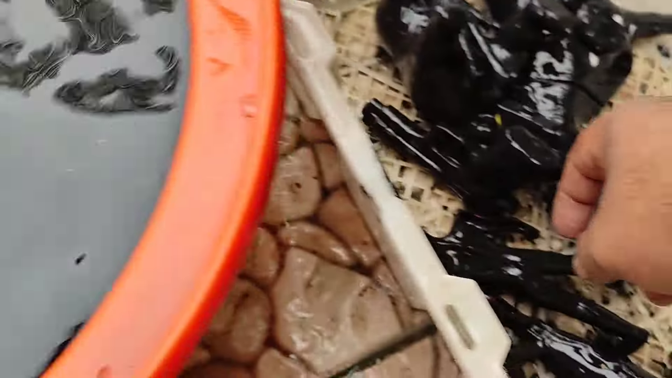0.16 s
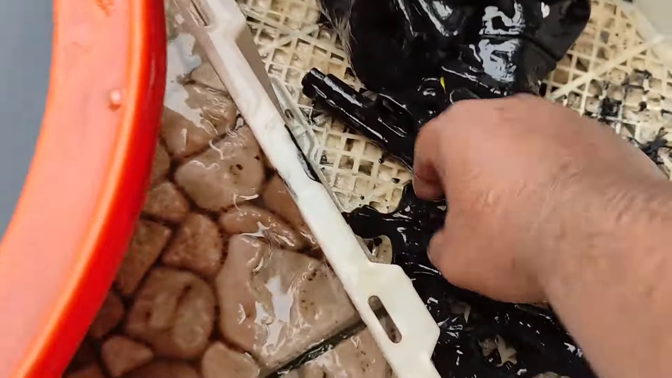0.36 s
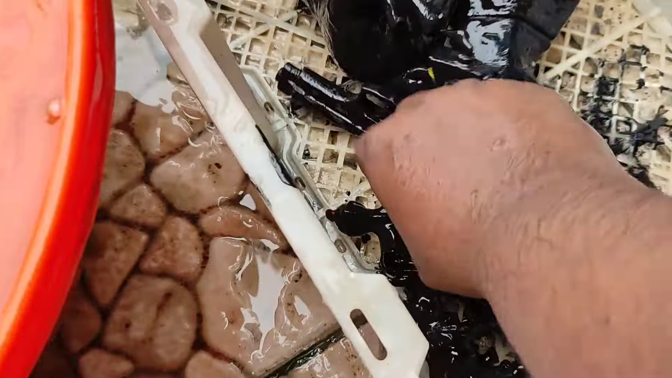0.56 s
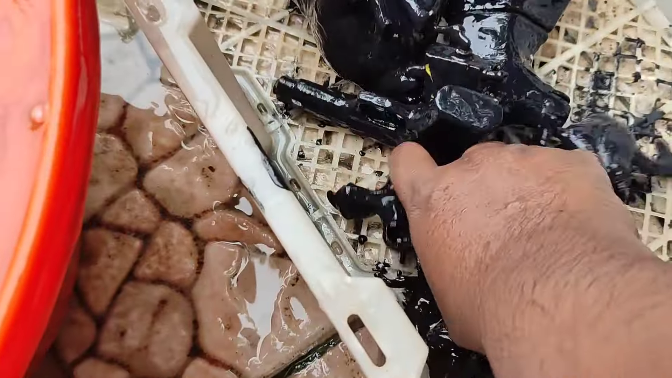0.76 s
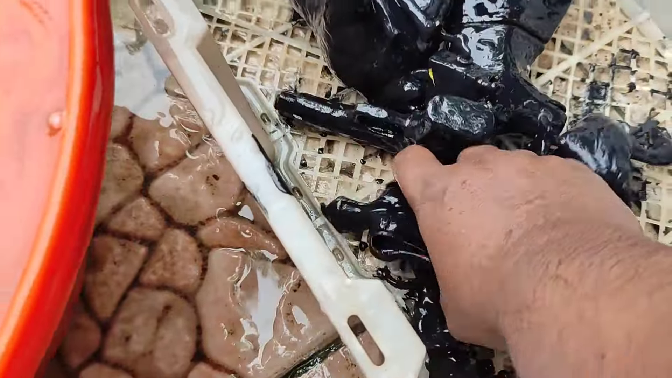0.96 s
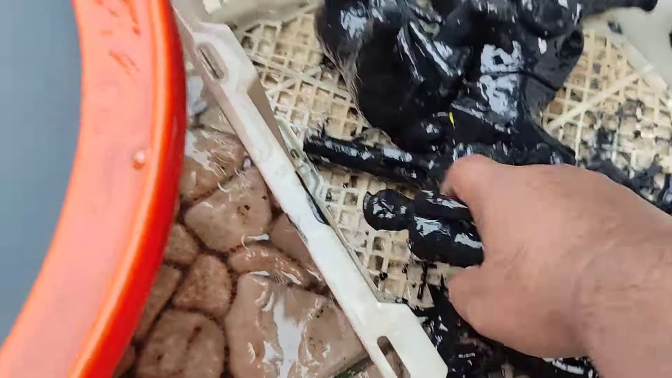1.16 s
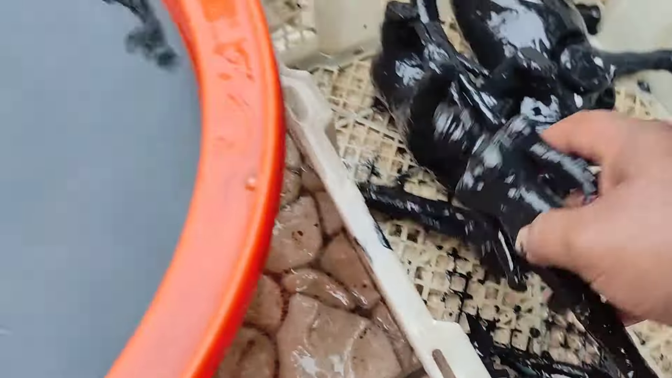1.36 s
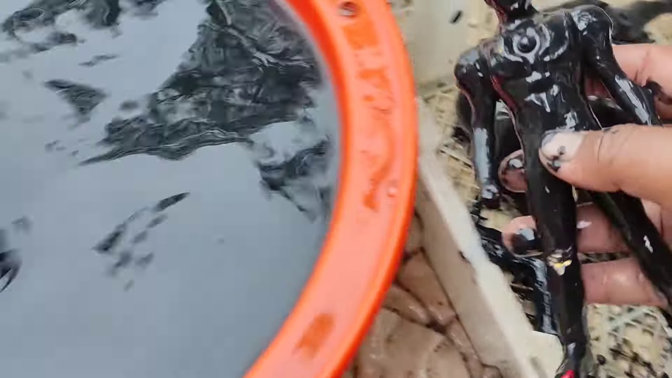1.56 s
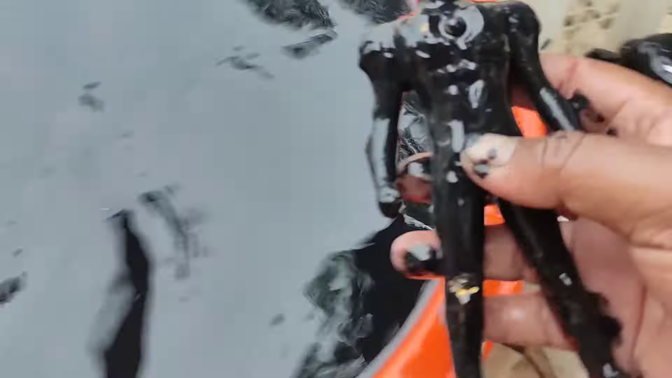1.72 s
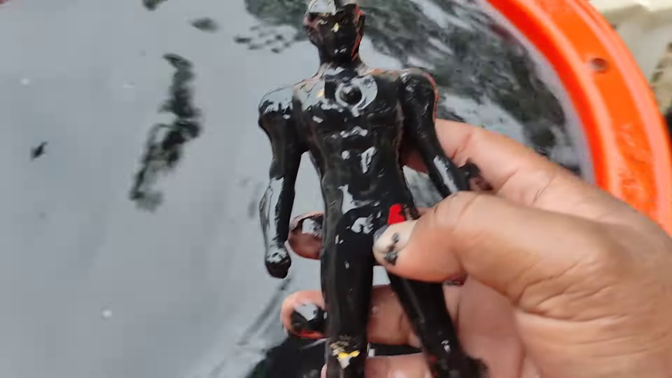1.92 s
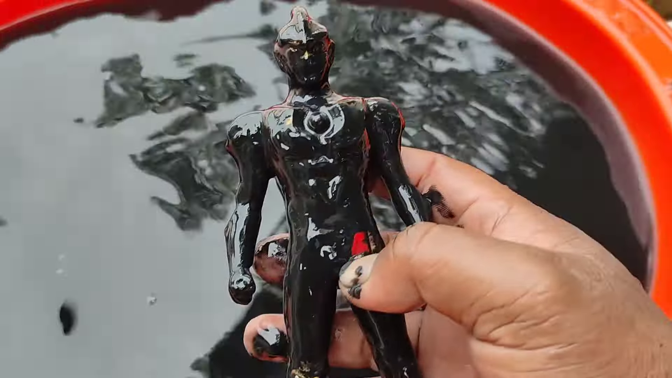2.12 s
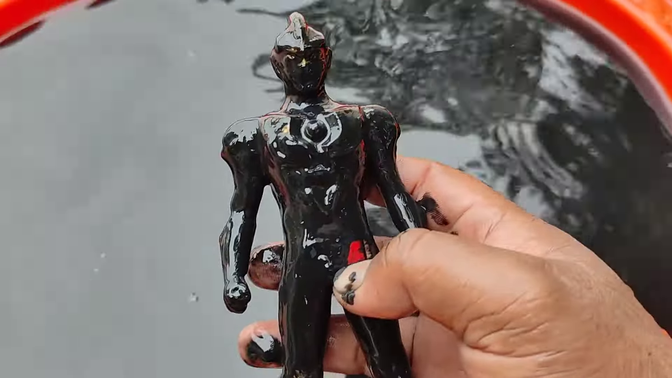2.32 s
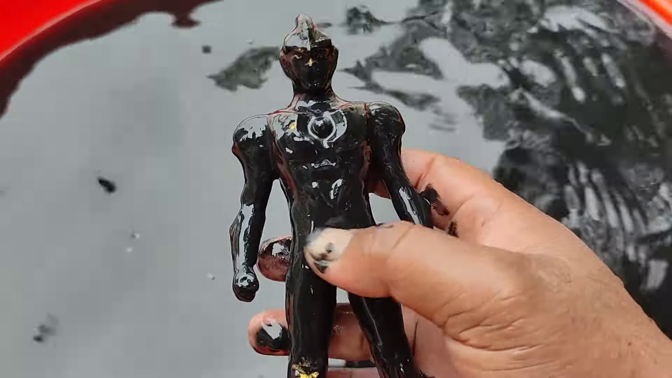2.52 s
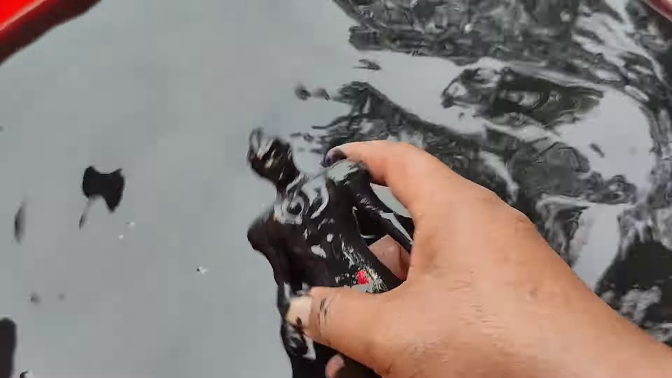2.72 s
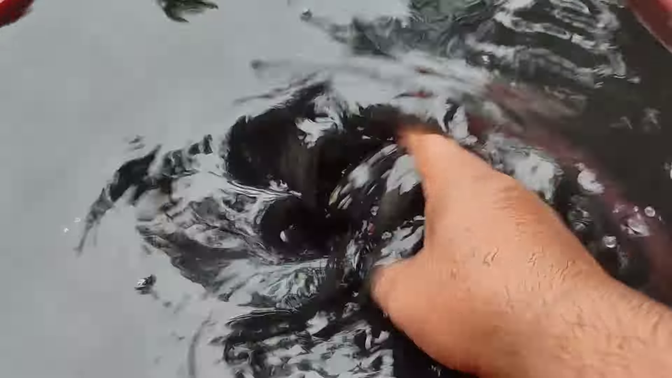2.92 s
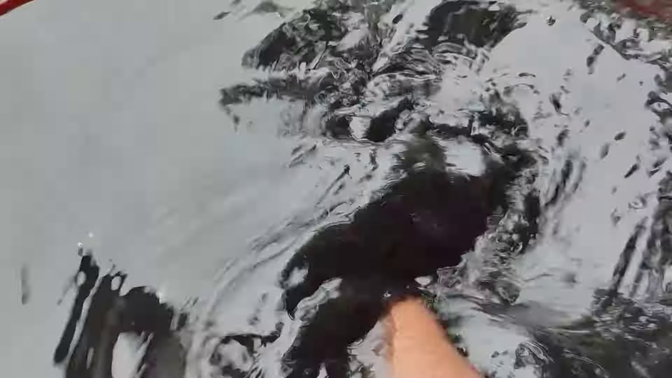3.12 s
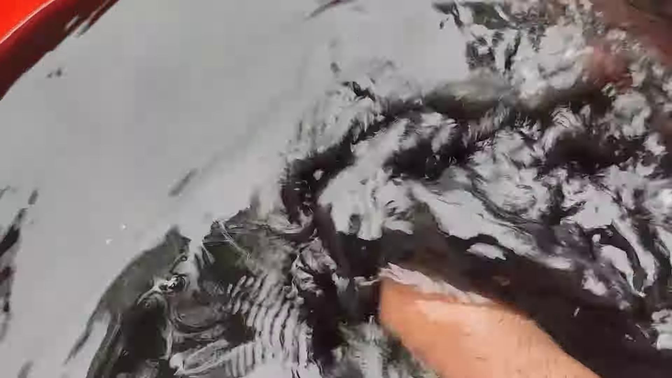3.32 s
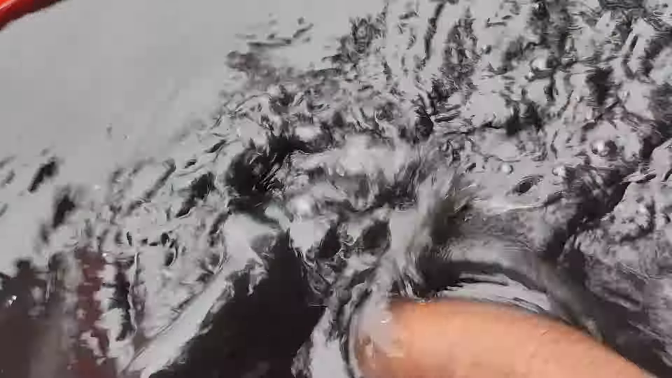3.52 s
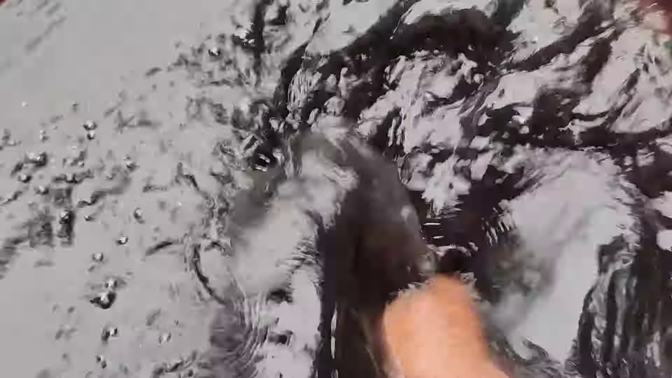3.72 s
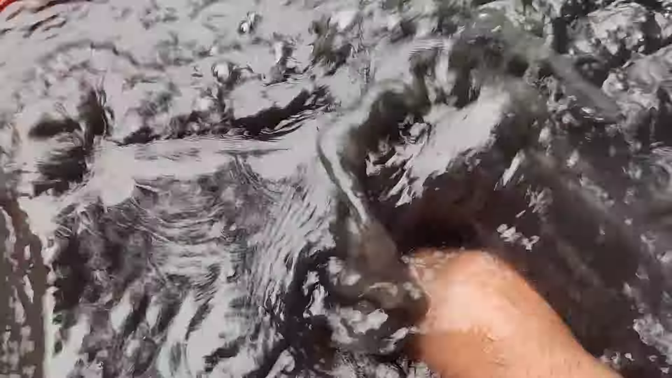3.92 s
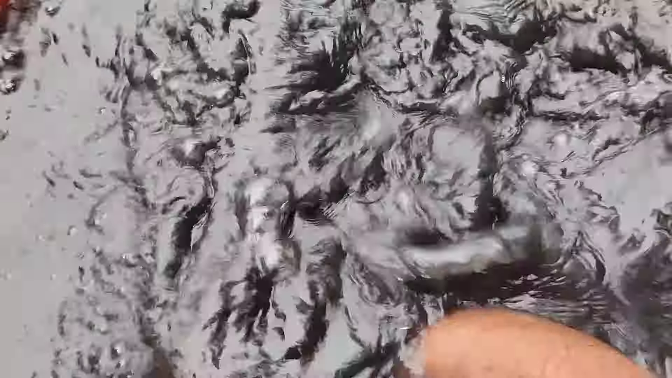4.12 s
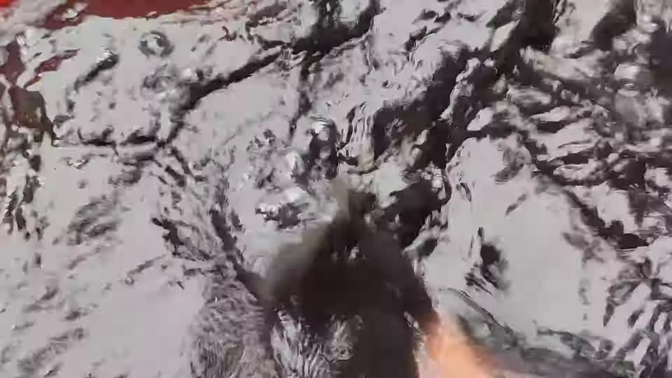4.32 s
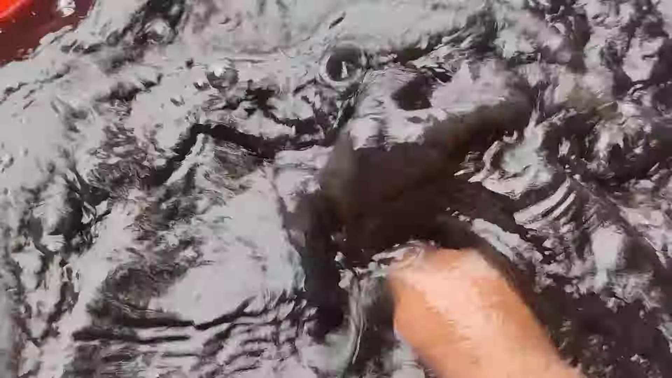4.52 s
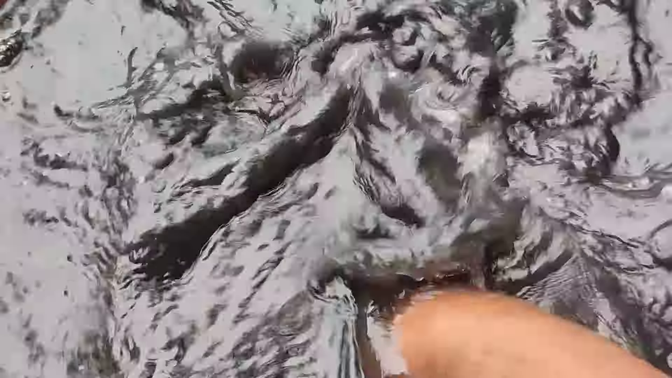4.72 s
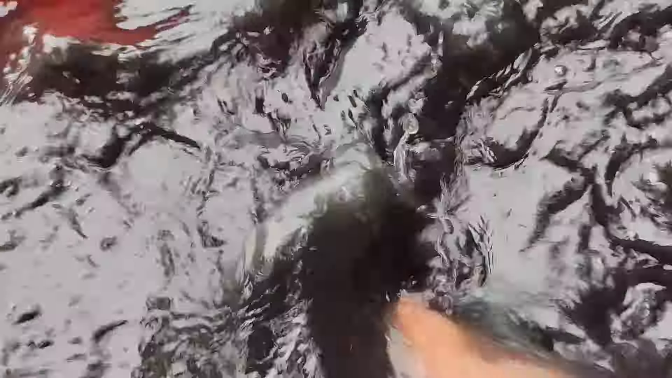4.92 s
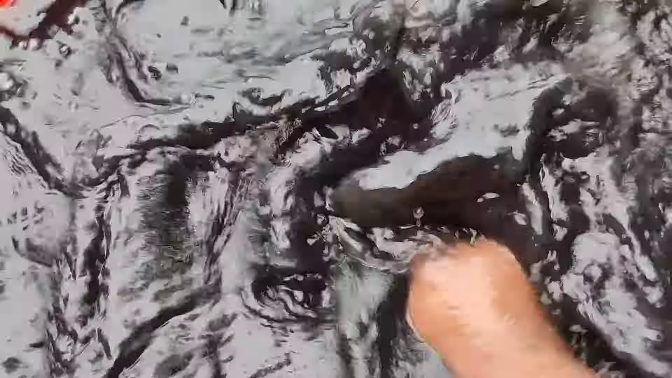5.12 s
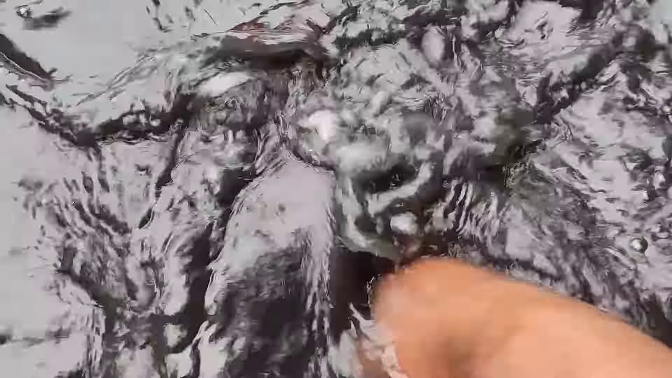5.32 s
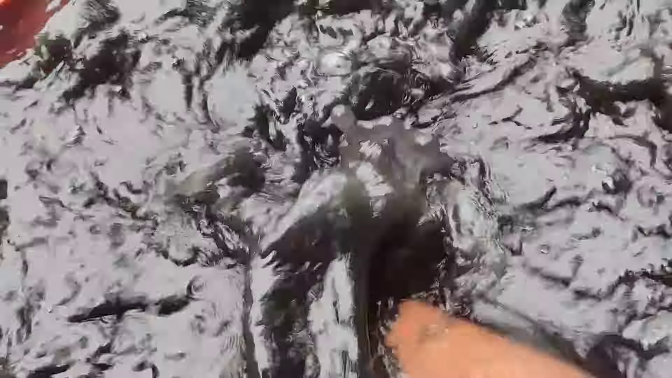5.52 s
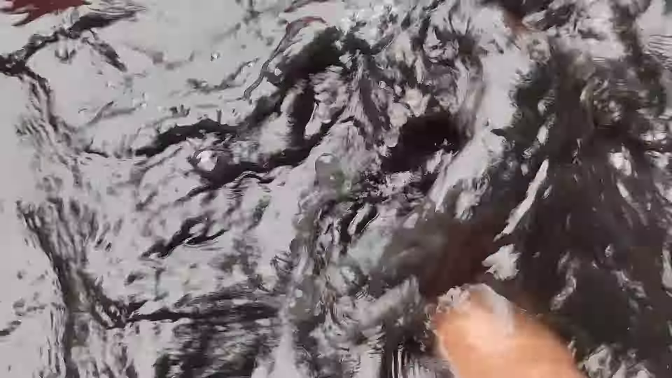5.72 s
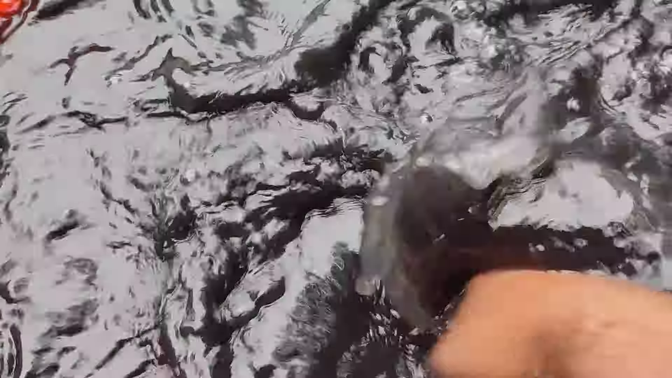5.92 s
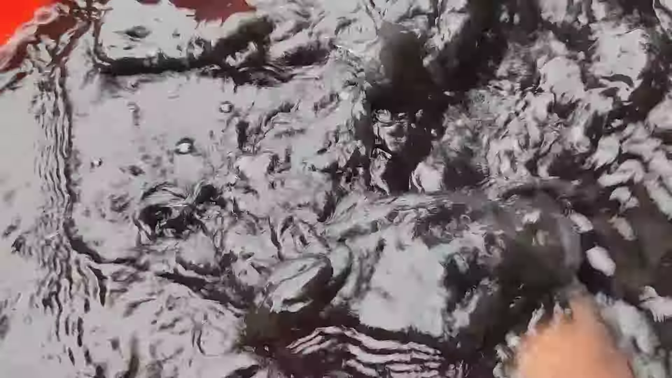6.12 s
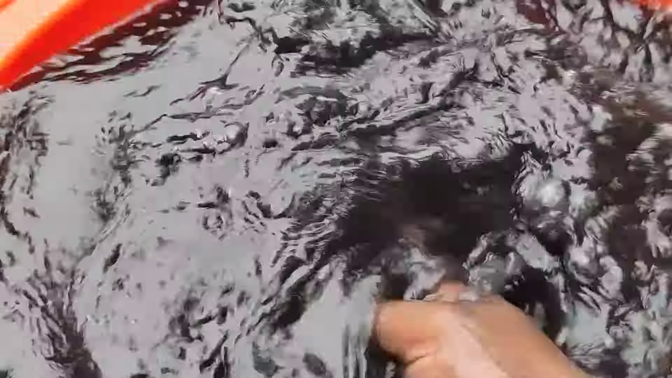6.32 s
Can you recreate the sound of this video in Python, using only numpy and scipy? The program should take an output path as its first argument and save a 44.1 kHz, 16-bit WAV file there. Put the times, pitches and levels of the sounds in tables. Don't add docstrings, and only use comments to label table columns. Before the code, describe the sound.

First, light plastic knocks and gritty wet scrapes, near and dry, with thin bird whistles and a distant low rumble behind. A brief lull follows, then a dunk into a water tub: vigorous hand stirring, plopping air pockets, ticking droplets, small slaps and patchy fizz, without rest. A faint far engine drone sits underneath. Outdoors, close microphone, slight reflections.

```python
import sys
import numpy as np
from scipy import signal
from scipy.fft import rfft, irfft, next_fast_len
from scipy.io import wavfile

SR = 44100
rng = np.random.default_rng(int(sys.argv[2]) if len(sys.argv) > 2 else 0)


def file_out(sig):
    cols = np.atleast_2d(sig).T
    lim = np.clip(cols, -1, 1)
    pcm = np.round(lim * 32767).astype(np.int16)
    wavfile.write(sys.argv[1], SR, pcm)


def field_ratio(decibels):
    return 10 ** (np.asarray(decibels, dtype=float) / 20)


N = 284930
LEFT_LAG_S = 0.000095
DUNK_S = 2.905


def rms_one(x):
    return x / np.sqrt(np.mean(x ** 2) + 1e-20)


def at_hz(points, hz):
    points = np.array(points)
    return np.interp(np.log(hz), np.log(np.maximum(points[:, 0], 1)), points[:, 1])


def colour(x, points):
    size = next_fast_len(N)
    hz = np.maximum(np.fft.rfftfreq(size, 1 / SR), 1)
    return irfft(rfft(x, size) * field_ratio(at_hz(points, hz)), size)[..., :N]


def drift(rate_hz):
    r = np.exp(-80 * np.pi * rate_hz / SR)
    noise = rng.standard_normal(N // 40 + 2002)
    slow = signal.lfilter([1], [1, -2 * r, r * r], noise)[2000:]
    return np.interp(np.arange(N) / 40, np.arange(len(slow)), rms_one(slow))


def ring(clicks, hz, t60):
    r, w = field_ratio(-60 / (t60 * SR)), 2 * np.pi * hz / SR
    return signal.lfilter([0, np.sin(w)], [1, -2 * r * np.cos(w), r * r], clicks + 1e-18)


def add(out, s, sound, pan_db, lag_s):
    at = round(s * SR)
    index = np.arange(len(sound))
    late = np.interp(index - lag_s * SR, index, sound, 0)
    pair = np.array([late, sound]) * field_ratio([[pan_db / 2], [-pan_db / 2]])
    out[:, at:at + len(sound)] += pair[:, :N - at]


def grains(per_s, spread_db, low_hz, high_hz, cycles, count):
    out = np.zeros((2, N))
    sizes = field_ratio(spread_db * np.minimum(rng.exponential(1, N), 5)) * rng.choice([-1, 1], N)
    born = rng.random(N) < per_s / SR
    dealt = rng.integers(0, count, N)
    for k, hz in enumerate(np.geomspace(low_hz, high_hz, count)):
        rung = ring(sizes * born * (dealt == k), hz, cycles / hz) * np.sqrt(hz)
        lag = round(LEFT_LAG_S * SR * rng.normal(1, 0.91))
        out += [np.roll(rung, lag), rung]
    return out


def efforts(rows, rise_db_per_s, fall_db_per_s):
    t = np.arange(0, N, 32) / SR
    power = 0
    for s, hold, db, over_db in rows:
        before, after = np.maximum(s - t, 0), np.maximum(t - s - hold, 0)
        shape_db = db - rise_db_per_s * before - fall_db_per_s * after
        power = power + field_ratio(shape_db + np.array([[0], [over_db]])) ** 2
    return [np.interp(np.arange(N) / SR, t, np.sqrt(p)) for p in power]


def surroundings():
    # start_s, rumble_db, drone_db
    traffic = [
        (0, -47, -69),
        (2.6, -48.5, -70),
        (2.8, -47.5, -49),
        (4.6, -45.5, -52.5),
        (5.6, -45.5, -50.5),
        (6.46, -48, -52.5),
    ]
    # pitch_hz, level_db
    air_spectrum = [(25, -24), (45, -31), (65, -6), (85, -12.5), (135, -1.5), (190, -5.5), (250, -7.5),
                    (400, -16), (560, -24.5), (1360, -31), (5500, -41), (8200, -43), (14500, -45.5),
                    (16000, -62)]
    # pitch_hz, correlation (-1 to 1)
    likeness = [(60, 1), (380, 0.66), (2380, -0.25), (15000, 0.16)]
    drone_hz, drone_width_hz = 245.2, 4.4
    start_s, *levels_db = np.transpose(traffic)
    rumble_db, drone_db = [np.interp(np.arange(N) / SR, start_s, db) for db in levels_db]
    size = next_fast_len(N)
    hz = np.maximum(np.fft.rfftfreq(size, 1 / SR), 1)
    mid, side = rfft(rng.standard_normal((2, size))) * field_ratio(at_hz(air_spectrum, hz))
    alike = np.clip(at_hz(likeness, hz), -1, 1)
    air = irfft(np.sqrt(1 + alike) * mid + np.sqrt(1 - alike) * side * [[1], [-1]], size)[:, :N]
    drone = rms_one(ring(rng.standard_normal(N), drone_hz, 2.15 / drone_width_hz))
    return field_ratio(rumble_db + 0.22 * drift(5.7)) * rms_one(air) + field_ratio(drone_db) * drone


def birds():
    # start_s, length_s, start_hz, end_hz, level_db
    chirps = [(0.073, 0.081, 7700, 7200, -70), (0.132, 0.13, 4920, 4530, -66.5),
              (1.056, 0.08, 7660, 6840, -80), (2.077, .07, 7200, 6900, -80),
              (.32, 0.069, 7730, 6470, -66.5), (1.262, 0.072, 2440, 2210, -73),
              (1.316, 0.1, 2090, 2030, -59.5), (1.398, 0.048, 1780, 1220, -60.5),
              (1.45, 0.17, 7500, 6700, -75), (1.505, 0.106, 1754, 1630, -56),
              (1.61, 0.066, 1485, 1413, -58), (1.657, 0.11, 1610, 1514, -63), (1.67, 0.11, 4540, 3200, -74),
              (1.871, 0.1, 7670, 6450, -70), (2.049, 0.04, 2440, 2560, -66.5),
              (2.106, 0.23, 1774, 1846, -69), (2.41, 0.094, 7730, 6100, -69.5),
              (2.447, 0.071, 7400, 7160, -81), (2.58, 0.25, 3450, 3575, -75.5),
              (1.93, .08, 6950, 6840, -77), (2.46, 0.083, 6900, 6730, -75), (2.72, 0.072, 7500, 7500, -73)]
    out = np.zeros((2, N))
    flutter = 0.86 + np.array([drift(90) * np.cos(3 * drift(45)) for port in range(2)])
    for s, length, start_hz, end_hz, db in chirps:
        t = np.arange(round(1.3 * length * SR)) / SR
        hz = np.interp(t, [0, length], [start_hz, end_hz])
        shape = np.sin(np.pi * (t / t[-1]) ** 0.58)
        whistle = field_ratio(db + 1.0) * shape * np.sin(2 * np.pi * np.cumsum(hz) / SR)
        at = round(s * SR)
        out[:, at:at + len(t)] += flutter[:, at:at + len(t)] * whistle
    late = np.arange(SR // 5) / SR
    echoes = rng.standard_normal((2, len(late))) * field_ratio(-130 * late - 31.0)
    return out + signal.fftconvolve(out, echoes, axes=1)[:, :N]


def crate():
    # start_s, peak_db, tick_db over the body, hardness_db_per_octave
    knocks = [(0.664, -40.5, -4.5, -3), (0.684, -51, -18, 0), (0.692, -33, -14, -3), (.706, -33, -6, -1),
              (0.731, -23, -14, -11), (0.7742, -8.5, -19.5, 2), (0.7868, -21.5, -17, -3),
              (0.851, -28, -24, -8), (0.887, -34, -12, 2), (1.063, -48, -12, 13), (1.095, -25, -34, -7.5),
              (1.138, -27, -18, -4.5), (1.154, -26, -5, -6), (1.227, -34, -30, -4), (1.26, -36, -28, -2.5),
              (1.54, -18, -38, -4.5), (1.556, -34, -2, -10), (1.296, -49, -25, -3)]
    # pitch_hz, level_db, t60_s
    modes = [(267, -12, 0.16), (415, -3, 0.1), (776, 1.5, 0.029), (914, 1, 0.012), (1257, -3.5, 0.02),
             (1660, 3, 0.016), (2440, -28, 0.017), (2640, -14, .02)]
    # full_effort_s, hold_s, body_db, wet rasp_db over the body
    pulls = [
        (.69, 0.053, -40.5, -14.5),
        (.77, 0.072, -43, -3),
        (.85, 0.077, -40, -11.5),
        (1.04, 0.053, -51, -4),
        (1.095, 0.017, -66, -17),
        (1.14, 0.017, -50, -0.5),
        (1.23, 0.064, -48, -17),
        (1.55, 0.043, -50.5, -10.5),
        (1.69, 0.097, -61, -6.5),
    ]
    # pitch_hz, level_db per Hz
    rasp_spectrum = [(700, -2), (1200, -19), (2500, -10.5), (8000, -17.5), (12000, -17), (13500, -25),
                     (16000, -60)]
    slips_per_s = 700
    body_gain, rasp_gain = efforts(pulls, rise_db_per_s=500, fall_db_per_s=297)
    table = np.array(knocks)
    at = [round(s * SR) for s in table[:, 0]]
    stutter = drift(27)
    slips = rng.random(N) < slips_per_s / SR
    rubbing = rng.standard_normal(N) ** 2 * slips * field_ratio(2.4 * stutter)
    strengths = rng.standard_normal((len(at), len(modes)))
    hits, rub = np.zeros(N), np.zeros(N)
    for (hz, level_db, t60), own in zip(modes, strengths.T):
        clicks = np.zeros(N)
        clicks[at] = field_ratio(table[:, 1] + level_db - 9.5 + 1.8 * own + table[:, 3] * np.log2(hz / 600))
        bounce = np.roll(clicks, round(0.00185 * SR))
        hits += ring(clicks, hz, t60) - 0.67 * ring(bounce, hz * 1.22, t60 / 2)
        rub += field_ratio(level_db - 11.0 * hz / 1000) * ring(rubbing, hz, 0.032)
    struck = signal.lfilter(*signal.butter(2, 210, "high", fs=SR), hits)
    body = struck + field_ratio(1.0) * body_gain * rms_one(rub)
    out = np.array([np.roll(body, round(0.00022 * SR)), body])

    dull = signal.butter(2, [600, 1900], "band", fs=SR)
    t = np.arange(SR // 25) / SR
    for (s, db, tick_db, hardness), burst in zip(knocks, rng.standard_normal((len(at), len(t)))):
        thud = field_ratio(hardness - 13.5) * rms_one(signal.lfilter(*dull, burst))
        tick = field_ratio(tick_db - 4.0) * signal.lfilter([.6, .6], [1], burst)
        add(out, s, field_ratio(db) * (thud + tick) * np.exp(-t / 0.0047), 0, LEFT_LAG_S)

    scrapes = rms_one(grains(1800 * field_ratio(4.1 * stutter), 4.0, 1160, 18500, 9.2, count=12))
    rasp = scrapes + 0.69 * rng.standard_normal((2, N))
    return out + field_ratio(4.5) * rasp_gain * rms_one(colour(rasp, rasp_spectrum))


def drops():
    # start_s, peak_db, ring_hz
    surface_drops = [(2.871, -32.5, 10700), (2.9177, -33, 11800), (2.9267, -24.5, 12100), (2.9476, -25, 3870),
                     (2.973, -29, 8240), (2.983, -26.5, 3260), (3.0185, -31.5, 8550), (3.0336, -30, 3180),
                     (3.0609, -23.5, 3300), (3.074, -23, 11900), (3.0963, -8.5, 11600), (3.151, -21, 5940),
                     (3.1756, -38, 8500), (3.1866, -28, 3070), (3.2069, -15.5, 3990), (3.2544, -12, 8200),
                     (3.2544, -34, 8650), (3.445, -27.5, 3380), (3.4624, -32, 4200), (3.4739, -25, 11250),
                     (3.5193, -46, 4300), (3.52, -37, 8840), (3.5293, -26.5, 8700), (3.6135, -33, 5970),
                     (3.6188, -17, 6450), (3.716, -37, 3750), (3.7513, -38, 11700), (3.8196, -23.5, 12300),
                     (3.8502, -18, 8450), (3.8784, -29, 3000), (3.9129, -36, 9050), (3.914, -25, 4300),
                     (3.954, -20, 4100), (3.9609, -13.5, 3940), (4.002, -22.5, 9760), (4.0697, -17.5, 6560),
                     (4.111, -28, 11150), (4.162, -23.5, 5800), (4.2325, -35, 8100), (4.2604, -25, 5350),
                     (4.2616, -23.5, 11530), (4.3523, -24.5, 10700), (4.4367, -31.5, 8550),
                     (4.4492, -32, 8850), (4.4875, -19, 8510), (4.515, -21, 7900), (4.5155, -15, 9170),
                     (4.6053, -38, 6800), (4.6053, -25, 6000), (4.613, -20.5, 4420),
                     (4.6488, -40, 7600), (4.673, -33, 11600), (4.693, -23.5, 11450), (4.751, -27, 8050),
                   (4.802, -23, 10900), (4.81, -20.5, 9800), (4.8214, -14, 10670), (4.9102, -25.5, 4560),
                   (4.9721, -41, 4620), (4.996, -24.5, 6460), (5.014, -24, 4600), (5.0375, -20, 8500),
                   (5.1188, -15.5, 5260), (5.1692, -38, 9200), (5.181, -20.5, 2980), (5.192, -21.5, 8940),
                   (5.216, -18.5, 8350), (5.248, -21, 3980), (5.254, -22, 10900), (5.2858, -35, 3710),
                   (5.347, -38, 8640), (5.3555, -26, 9120), (5.3977, -20, 10100), (5.5014, -34, 8400),
                   (5.527, -29, 8350), (5.5476, -39, 3230), (5.576, -26, 8370), (5.643, -42, 8600),
                   (5.662, -23, 10600), (5.682, -49, 8640), (5.6979, -9.5, 4940), (5.7736, -26.5, 4740),
                   (5.8352, -24, 11750), (5.86, -28, 3360), (5.8715, -21.5, 10800), (5.882, -32, 11800),
                   (5.905, -22, 11400), (5.9552, -9.5, 12000), (6.115, -31, 10900), (6.1407, -24, 3720),
                   (6.142, -25, 8200), (6.184, -17.5, 4010), (6.2016, -23.5, 3720), (6.2425, -27.5, 3030),
                   (6.2746, -31, 10700), (6.379, -34, 3130), (6.3968, -29, 8850), (6.448, -43, 5360),
                   (6.4457, -37, 8890),
                     (3.109, -21, 4550), (3.2485, -17, 5340), (3.2648, -11.5, 3020), (4.2374, -36, 8100),
                 (4.3774, -38, 8650), (4.459, -29.5, 3330), (4.5296, -17, 8100), (4.6244, -39, 9100),
                 (5.5894, -20, 8470), (5.706, -15, 8970), (6.1327, -25, 8470), (6.2738, -32, 10550),
                 (6.3092, -22, 8600), (3.084, -30, 8500), (3.088, -26, 10700), (3.1118, -18, 9250),
                 (3.104, -27, 8500), (3.2565, -14, 9070), (5.1208, -16.5, 6440), (5.584, -18.5, 8300),
                 (6.1884, -22, 9200)]
    # start_s, peak_db
    slaps = [(2.9189, -20.5), (2.9488, -42), (2.9728, -28.5), (2.9931, -23.5), (3.0592, -38),
             (3.1892, -25.5), (3.2628, -22), (3.4728, -23.5), (3.6186, -20), (3.926, -22), (4.0699, -17.5),
             (4.8218, -29), (4.9943, -27), (5.037, -17), (5.1201, -18), (5.2856, -18), (5.47, -41),
             (5.5464, -15.5), (5.8996, -17), (5.9545, -14.5), (6.186, -38), (6.2817, -20.5)]
    lead_s, drop_swell_s, slap_swell_s, dies_s = .002, 0.0005, .0002, 0.00086
    out = np.zeros((2, N))
    t = np.arange(SR // 25) / SR
    late = t - lead_s - drop_swell_s
    rows = surface_drops + [(s, db + 6.0, 1000) for s, db in slaps]
    chance = rng.standard_normal((len(rows), 3))
    noise = rng.standard_normal((len(rows), 2, len(t)))
    for (s, db, hz), (pan, lag, size), pair in zip(rows, chance, noise):
        is_drop = hz > 2000
        crackle_in = np.exp(np.minimum(late, 0) / (drop_swell_s if is_drop else slap_swell_s))
        die = 0.6 * np.exp(-late / (dies_s * field_ratio(4.8 * size))) + 0.22 * np.exp(-late / 0.006)
        shape = np.where(late < 0, crackle_in, die)
        band = signal.butter(2, [hz / 3.45, min(hz * 1.93, 15000)], "band", fs=SR)
        burst, scatter = rms_one(signal.lfilter(*band, pair))
        tone = 0.59 * is_drop * np.sin(2 * np.pi * hz * t * (1 + 6 * t)) * np.exp(-t / 0.0062)
        sound = field_ratio(db + 2.0) * shape * (0.26 * burst + tone)
        add(out, s - lead_s, sound, 11.0 * pan, LEFT_LAG_S * (1 + 0.37 * lag))
        add(out, s - lead_s, field_ratio(db - 20.5) * shape * scatter, 24, 0)
    return out


def bubbles(rows):
    pinch_share, pinch_s = .14, .001
    pop_db = 60
    out = np.zeros((2, N))
    chance = rng.standard_normal((len(rows), 3))
    for (s, db, start_hz, end_hz, fade), (pan, lag, turn) in zip(rows, chance):
        swell = 0.0013 + 0.021 * fade
        t = np.arange(round((swell + 3 * fade) * SR)) / SR
        glide = (end_hz - start_hz) * np.minimum(t / (swell + fade), 1.5)
        hz = start_hz + glide - pinch_share * start_hz * np.exp(-t / pinch_s)
        rise = np.clip(t / swell, 0, 1) ** 0.5
        fades = (t - swell) / fade
        fall = field_ratio(-13 * np.maximum(fades, 0) ** 0.84 - pop_db * np.maximum(fades - 1, 0))
        fast_wobble = 0.35 * np.sin(2 * np.pi * 90 * t + 3 * turn)
        slow_wobble = 0.32 * np.sin(2 * np.pi * 47 * (1 + 0.14 * pan) * t + 3 * lag)
        tone = np.sin(2 * np.pi * np.cumsum(hz) / SR)
        sound = field_ratio(db + 1.5) * rise * fall * (1 + fast_wobble + slow_wobble) * tone
        add(out, s, sound, 2.0 * pan, LEFT_LAG_S * (1.42 + .5 * lag))
    return out


def swarm(count):
    when, size, glide, luck = rng.random((count, 4)).T
    s = DUNK_S + (N / SR - DUNK_S) * when
    hz = 720 * 4.86 ** size ** 1.21
    fade = 8.7 / hz * (0.64 + 1.33 * glide)
    db = 7 * luck ** 4.8
    return bubbles(np.transpose([s, db, hz, hz * (0.956 + 0.22 * glide), fade]))


def stirred_water():
    # full_effort_s, hold_s, spray_db, gurgle_db over the spray
    strokes = [(2.92, 0.011, -57, 7.5), (3.065, 0.047, -46.5, 4.5), (3.245, 0.013, -44.5, 6.5),
               (3.46, 0.086, -62.5, 18), (3.62, 0.018, -64, 16.5), (3.84, 0.027, -66, 20),
               (3.9, 0.068, -39, -3.5), (4.03, .13, -43.5, -3.5), (4.26, 0.0084, -41.5, -4.5),
               (4.37, 0.074, -63, 14.5), (4.51, 0.018, -50.5, -5), (4.6, 0.28, -50.5, -10),
               (4.82, 0.064, -43, -9.5), (5.02, 0.19, -43.5, -5.5), (5.26, 0.017, -41.5, -11),
               (5.39, 0.047, -42, 4), (5.55, 0.056, -40, 0), (5.66, 0.073, -45, -3.5),
               (5.84, 0.021, -50, -15), (5.89, 0.12, -46, -1.5), (6.15, .17, -42, -15),
               (6.45, 0.022, -45.5, -4)]
    # pitch_hz, level_db
    spray_spectrum = [(900, -14), (1500, -10), (2500, -15), (4200, -7.5), (6400, -15), (7300, -13.5),
                      (8670, -5.5), (10100, -11), (12100, -5), (14600, -18.5), (16000, -10)]
    lapping_db = -58
    wet = np.arange(N) / SR > DUNK_S
    stroke_gains = efforts(strokes, rise_db_per_s=259, fall_db_per_s=186)
    spray_gain, gurgle_gain = wet * np.hypot(stroke_gains, field_ratio([[lapping_db], [lapping_db + 2.5]]))
    clumps = drift(45)
    fizz = rms_one(grains(1600 * field_ratio(2.5 * clumps), 3.74, 1457, 15300, 26.0, count=22))
    hiss = rng.standard_normal((2, N)) * field_ratio(4.5 * clumps)
    spray = rms_one(colour(fizz + 0.9 * hiss, spray_spectrum))
    wash = rms_one(grains(2000 * field_ratio(4.0 * clumps), 3.4, 580, 3470, 5.4, count=11))
    gurgle = 0.73 * rms_one(swarm(count=800)) + 0.69 * wash
    return field_ratio(4.0) * spray_gain * spray + field_ratio(1.0) * gurgle_gain * gurgle


def trapped_air():
    # start_s, peak_db, start_hz, end_hz, fade_s
    pockets = [(3.086, -22, 1200, 1300, .013), (3.095, -22, 1330, 1500, .007), (3.209, -28, 650, 720, .007),
               (3.231, -31, 800, 790, .012), (3.249, -28, 460, 375, .014), (3.265, -22, 660, 800, .009),
               (3.276, -28, 780, 880, .010), (3.453, -29, 350, 430, .042), (3.4745, -21, 980, 1300, .021),
               (3.619, -21, 520, 820, .026), (3.849, -28, 620, 840, .022), (3.9265, -8, 610, 715, .025),
               (3.967, -31, 614, 800, .014), (4.36, -35, 740, 1100, .03), (5.038, -16, 1255, 910, .011),
               (5.057, -30, 440, 360, .028), (5.082, -31, 400, 680, .042), (5.18, -37, 700, 850, .03),
               (5.227, -32, 740, 1050, .04), (5.288, -18, 720, 1120, .022), (5.357, -25, 383, 500, .035),
               (5.383, -26, 540, 700, .024), (5.401, -17.5, 700, 780, .018), (5.42, -27, 780, 980, .022),
               (5.564, -21, 480, 430, .018), (5.59, -27, 380, 420, .055), (5.901, -19, 1050, 1150, .02),
               (5.955, -28, 420, 340, .03), (6.255, -32, 740, 670, .03), (6.303, -32, 480, 520, .045),
               (4.122, -33, 850, 900, .01), (5.43, -33, 1200, 1350, .01)]
    # start_s, peak_db, pitch_hz
    small_bubbles = [(2.948, -33.5, 750), (3.929, -22, 1800), (3.066, -24, 980), (3.072, -22, 1560),
                     (4.07, -14.5, 1500), (3.188, -34, 767), (3.777, -24, 1966), (3.815, -26, 1190),
                     (3.853, -27.5, 1375), (3.915, -29, 770), (3.951, -23, 1670), (4, -18.5, 1810),
                     (4.072, -20, 890), (4.133, -25, 687), (4.264, -23.5, 862), (4.519, -28.5, 1390),
                     (4.823, -26.5, 1054), (5.285, -22, 1400), (4.907, -30, 1140), (4.997, -27, 770),
                     (5.036, -17.5, 1735), (5.072, -25, 964), (5.122, -31, 1600), (5.471, -22.5, 1540),
                     (5.547, -24.5, 824), (5.553, -16.5, 1384), (5.909, -24, 2140), (6.009, -29, 1090),
                     (6.188, -33, 644), (6.279, -38, 1070),
                     (3.043, -37, 940), (3.059, -23, 1490), (3.077, -27, 1280), (3.099, -34, 630),
             (3.119, -50, 770), (3.134, -42, 1150), (3.406, -36.5, 1470), (3.58, -35, 710),
             (3.754, -38, 930), (3.833, -32.5, 616), (4.05, -30.5, 805), (4.192, -38, 1550),
             (4.437, -31, 1980), (4.845, -30.5, 1510), (5.029, -22, 1510), (5.105, -29, 1044),
             (5.254, -31, 1720), (5.375, -26.5, 1450), (5.412, -32, 1650), (5.63, -37, 980),
             (5.702, -39, 1530), (5.791, -38.5, 980), (5.859, -32.5, 1450), (6.155, -29.5, 2000),
             (6.254, -36, 1440), (6.294, -34, 1940), (6.45, -32, 1320), (5.9007, -20.5, 1395),
             (5.954, -30, 804), (3.473, -28, 1420), (5.5477, -22.5, 1440), (2.9165, -28, 1246),
             (3.532, -30.5, 2120), (3.62, -28.5, 1600), (5.923, -34, 1300),
                     (2.948, -32.5, 1184), (2.971, -40.5, 656), (3.037, -28, 2239), (3.094, -26, 2260),
              (3.188, -32.5, 2170), (3.245, -33, 1260), (3.263, -36, 2304), (3.403, -36, 736),
              (3.617, -39, 2130), (3.909, -37, 1442), (4.163, -38, 732), (4.276, -30.5, 2239),
              (4.363, -38, 1430), (4.862, -37, 1560), (4.998, -24.5, 2650), (5.019, -31.5, 950),
              (5.09, -32, 1033), (5.181, -28.5, 2411), (5.252, -30.5, 1227), (5.33, -28, 2550),
              (5.562, -23.5, 1937), (5.589, -32, 1070), (5.59, -31, 2131), (5.704, -33, 1700),
              (5.991, -30.5, 1485), (6.294, -34, 760)]
    # start_s, peak_db, pitch_hz
    murmurs = [(3.53, -38.5, 757), (4.22, -38.5, 1235), (4.466, -39, 794), (4.64, -36.5, 903),
               (4.72, -36.5, 860), (3.545, -38.5, 555), (5.653, -30.5, 870), (5.85, -44, 940),
               (3.34, -51, 483), (3.384, -37.5, 418), (4.849, -33.5, 960), (6.108, -37, 1310),
               (6.38, -41.5, 604)]
    rise_share, small_cycles, murmur_cycles = 0.081, 10.6, 16.4
    small = [(s, db, hz, hz * (1 + rise_share), small_cycles / hz)
             for s, db, hz in small_bubbles]
    slow = [(s, db, hz, hz, murmur_cycles / hz) for s, db, hz in murmurs]
    return bubbles(pockets + small + slow)


def basin_echo(x):
    dull = signal.lfilter([.5], [1, -.5], x)
    out = np.zeros((2, N))
    for k, lag in enumerate((rng.uniform(.002, .03, size=8) * SR).astype(int)):
        turned = dull[::(-1) ** k]
        late = np.pad(turned, [(0, 0), (lag, 0)])[:, :N]
        out += (-1) ** (k // 2) * field_ratio(-300 * lag / SR) * late
    return out


def scene():
    near = crate() + drops() + stirred_water() + trapped_air()
    return surroundings() + birds() + near + field_ratio(-20.5) * basin_echo(near)


def roll_off(x):
    return signal.sosfilt(signal.butter(12, 16650, fs=SR, output="sos"), x)


def record(dry):
    # pitch_hz, difference_db
    port_difference = [(200, -0.5), (1300, -2), (4200, -1.5), (6400, -8), (9800, -2), (15000, 6.5)]
    tilt = np.array(port_difference) * [1, .5]
    ported = np.array([colour(dry[0], tilt), colour(dry[1], tilt * [1, -1])])
    low_cut = signal.butter(2, 55, "high", fs=SR, output="sos")
    high_cut = signal.butter(10, 15000, fs=SR, output="sos")
    mix = signal.sosfilt(np.vstack([low_cut, high_cut]), ported)
    return roll_off(mix)


dry = scene()
out = record(dry)
file_out(out)
```